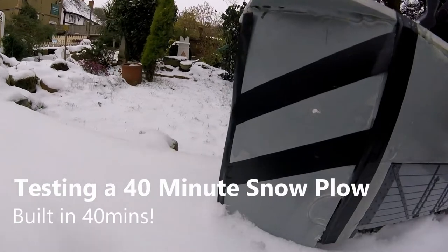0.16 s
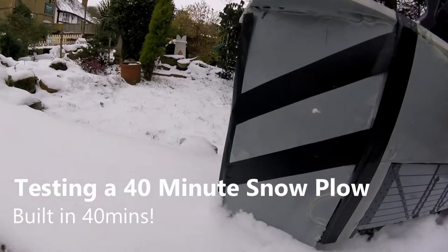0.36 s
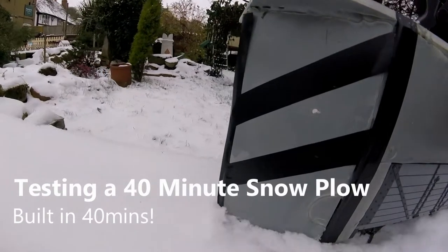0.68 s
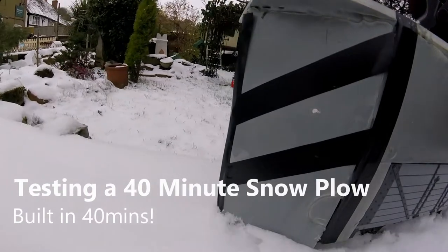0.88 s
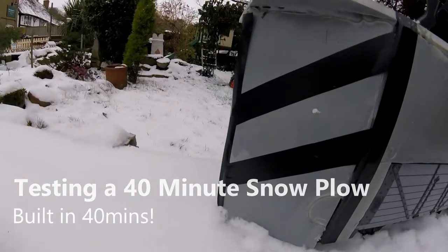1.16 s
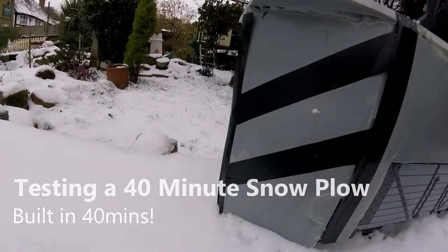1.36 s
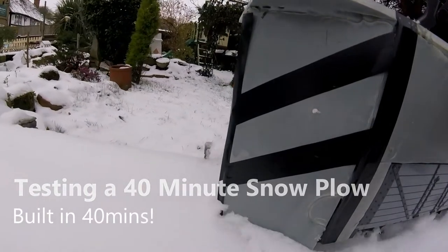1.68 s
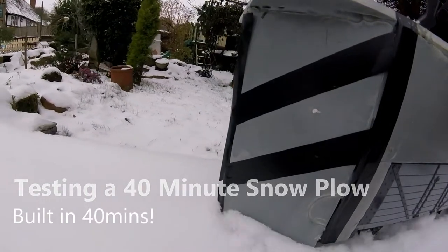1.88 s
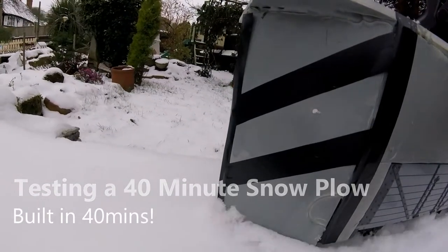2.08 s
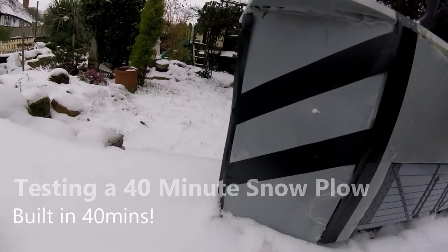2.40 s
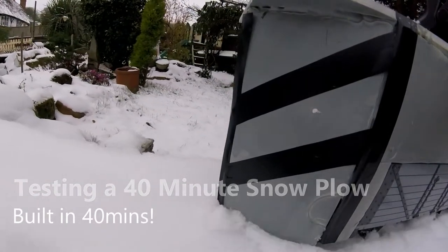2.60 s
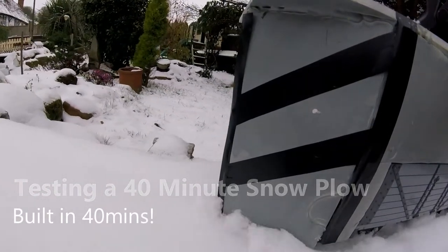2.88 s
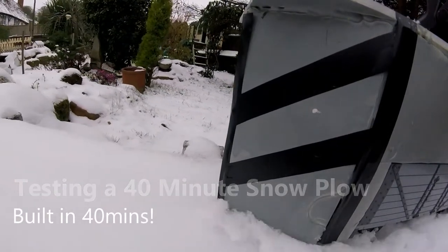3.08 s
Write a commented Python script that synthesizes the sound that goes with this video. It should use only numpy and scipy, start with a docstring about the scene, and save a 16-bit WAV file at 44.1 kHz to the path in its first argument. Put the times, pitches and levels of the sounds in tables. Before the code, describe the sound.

A model locomotive runs throughout, heard from an on-board microphone in dry open air. Its rough gear whirr and rattle step up slightly in pitch until about 1.8 s. Beneath it, deep rumble and booms pulse unevenly, with thumps strongest near 0.4 s and again at 1.1 s. A dry click comes at 0.5 s. Faint snow hiss, tiny ticks and thin whines continue to 3.25 s.

```python
"""Model locomotive ploughing snow, from on board

A microphone rides on a model locomotive as it pushes a plough through garden snow, in open air.
Gear harmonics locked to the shaft whirr over a loose noise rattle and quicken in small steps.
A gliding sine booms over filtered-noise rumble; bumps ring decaying modes of the body.
Snow is noise and grains shaped by the blade, with ticking crumbs; whines and a thin buzz
run through it, and one dry click is heard."""
import sys
import numpy as np
from scipy import signal
from scipy.fft import rfft, irfft
from scipy.io import wavfile
from scipy.ndimage import uniform_filter1d, map_coordinates

SR = 44100
rng = np.random.default_rng(int(sys.argv[2]) if len(sys.argv) > 2 else 0)


def transcribe(u):
    """Save the signal u as a 16-bit wav file named by the first command-line argument.

    u: samples, shape (n,) or (channels, n), limited to [-1, 1]; the rate is SR.
    q: integer samples, one column per channel.
    """
    v = np.clip(np.atleast_2d(u).T, -1, 1)
    q = np.round(v * 32767).astype(np.int16)
    wavfile.write(sys.argv[1], SR, q)


N = 143325
T = np.arange(N) / SR  # seconds

GEAR_WAVER, WAVER_PER_S = 0.26, 4.846  # slow swell: rms share of amplitude, changes per second
ROUGH_PER_S = 50  # fast roughness, changes per second


def undb(db):
    """Amplitude ratio from dB."""
    return 10 ** (np.asarray(db) / 20)


def unit(x):
    """Scale to rms 1."""
    return x / np.sqrt(np.mean(x ** 2))


def curve(rows, axis=1):
    """Gain over time from one dB column of a table that starts with seconds."""
    rows = np.array(rows, float)
    return undb(np.interp(T, rows[:, 0], rows[:, axis]))


def noise():
    """White noise."""
    return rng.standard_normal(N)


def walk(rate):
    """Smooth random motion of rms 1, changing about rate times a second."""
    hold = int(SR / rate)
    held = np.repeat(rng.standard_normal(N // hold + 3), hold)
    start = rng.integers(hold)
    return unit(uniform_filter1d(held, hold)[start:start + N])


def colour(x, points):
    """Shape by a spectrum of (Hz, dB) points; rms 1."""
    hz, db = np.array(points, float).T
    f = np.fft.rfftfreq(N, 1 / SR) + 1  # 1 Hz up, to keep the logarithm finite
    gain = undb(np.interp(np.log(f), np.log(hz), db))
    return unit(irfft(rfft(x) * gain, N))


def resonate(x, hz, width_hz):
    """One resonance, gain 1 at its centre."""
    return signal.lfilter(*signal.iirpeak(hz, hz / width_hz, fs=SR), x)


def resonate_twice(x, hz, width_hz):
    """The same resonance passed twice, for steeper skirts."""
    return resonate(resonate(x, hz, width_hz), hz, width_hz)


def fade(start, decay):
    """Sudden onset and exponential decay, both in seconds."""
    return (T >= start) * np.exp(-np.maximum(T - start, 0) / decay)


def shaft():
    """Turns made by the drive shaft: the running sum of a speed that steps up."""
    # Each row: start in seconds, shaft turns per second.
    speed_steps = [(0, 14.505), (.28, 14.72), (.52, 15.235), (.8, 15.476), (1.74, 16.291)]
    starts, rates = np.array(speed_steps).T
    stepped = rates[np.searchsorted(starts, T, side="right") - 1]
    return np.cumsum(uniform_filter1d(stepped, size=900)) / SR


def body():
    """The body's lowest resonance swells and sinks over wheel rumble and the rocking chassis."""
    # Boom pitch. Each row: time in seconds, pitch in Hz.
    boom_pitch = [(0, 76.6), (.6, 75.82), (1.0, 77.4), (1.3, 78.95), (1.5, 76), (2.0, 75), (2.2, 78.3),
                  (2.6, 77.6), (2.85, 80.4), (3.25, 79)]
    # Boom level. Each row: time in seconds, level in dB before smoothing and trim.
    boom_level = [(0.0, -36), (0.03, -14.5), (0.06, -31.5), (0.09, -15), (0.27, -24.5), (0.29, -32),
                  (0.39, -20), (0.405, -23), (0.43, -7.5), (0.47, -19.5), (0.54, -12), (0.59, -33),
                  (0.62, -19), (0.65, -36), (0.78, -16), (0.83, -32), (0.9, -20), (0.94, -36), (0.99, -33),
                  (1.01, -15), (1.09, -22.5), (1.12, -17.5), (1.18, -24.5), (1.24, -24), (1.26, -11),
                  (1.3, -29.5), (1.35, -32), (1.38, -11.5), (1.41, -24.5), (1.43, -15.5), (1.49, -20.5),
                  (1.54, -13.5), (1.59, -26), (1.76, -22.5), (1.79, -46), (1.82, -43), (1.86, -19),
                  (1.89, -15.5), (1.94, -35), (1.95, -21), (2.03, -27), (2.065, -16), (2.13, -37),
                  (2.17, -27.5), (2.205, -12.5), (2.24, -19), (2.32, -18), (2.34, -38), (2.38, -18),
                  (2.42, -32), (2.48, -14), (2.54, -36), (2.58, -16.5), (2.62, -19), (2.73, -29.5),
                  (2.75, -25.5), (2.88, -20), (2.96, -27.5), (2.99, -21), (3.05, -20), (3.09, -30),
                  (3.15, -27), (3.25, -41)]
    # Spectrum of the rolling wheels. Each row: frequency in Hz, relative density in dB.
    rumble_spectrum = [(20, -31.5), (55, -4.5), (75, -6.5), (98, -2), (122, -1), (145, -17), (195, -21.5),
                       (230, -10), (270, -17), (350, -13.5), (430, -24.5), (700, -38.5), (1800, -62.5),
                       (6000, -88.5)]
    # Each row: time in seconds, rumble level in dB before trim.
    rumble_level = [(0.0, -31.5), (0.14, -30.5), (0.24, -32.5), (0.38, -27), (0.86, -33.5), (1.05, -27.5),
                    (1.2, -31), (1.73, -34), (3.25, -33)]
    # Spectrum of the rocking chassis. Each row: frequency in Hz, relative density in dB.
    rock_spectrum = [(15, -10), (33, -9), (52, -2), (62, -1.5), (80, -19.5), (140, -46.5), (1000, -100)]
    # Each row: time in seconds, rocking level in dB before trim.
    rock_level = [(0.0, -26), (0.55, -28), (0.65, -36.5), (1.35, -24.5), (1.73, -36), (1.76, -31),
                  (1.97, -45), (2.03, -30.5), (2.37, -33), (2.48, -27), (2.51, -38.5), (3.25, -30.5)]
    boom_db, rumble_db, rock_db = 0.5, 3, 2.5  # trims
    boom_wander_hz, boom_slew_s = 1, 0.014

    hz = np.interp(T, *np.array(boom_pitch).T) + boom_wander_hz * walk(30.31)
    swell = uniform_filter1d(curve(boom_level), int(boom_slew_s * SR)) * undb(boom_db)
    boom = np.sqrt(2) * np.sin(2 * np.pi * np.cumsum(hz) / SR) * swell
    rumble = colour(noise(), rumble_spectrum) * curve(rumble_level) * undb(rumble_db)
    rocking = colour(noise(), rock_spectrum) * curve(rock_level) * undb(rock_db)
    return boom + rumble + rocking


def bumps():
    """Each bump in the track pushes the body briefly and rings its modes, which then die away."""
    # Each row: time in seconds, level in dB, tilt in dB from one mode to the next.
    bump_rows = [(0.365, -11, -3.5), (.402, -21, 5.5), (.42, -7, -18.5), (.597, -16, -3.5),
                 (1.109, -12.5, -16), (1.127, -12, 0.5), (1.25, -22, -8), (1.365, -22, -14),
                 (1.399, -35, 5), (2.745, -21, 2.5), (3.04, -21, 5.5)]
    # Modes of the body. Each row: frequency in Hz, level in dB, time to fall 60 dB in seconds.
    body_modes = [(114.5, -1.5, 0.16), (235, -2.5, 0.1), (345, -10.5, 0.082)]
    push_s = 0.0063  # time constant of the rise

    total = np.zeros(N)
    for at, db, tilt_db in bump_rows:
        for i, (hz, mode_db, t60) in enumerate(body_modes):
            envelope = fade(at, t60 / np.log(1000)) - fade(at, push_s)
            ring = envelope * np.sin(2 * np.pi * hz * (T - at))
            total += undb(db + mode_db + i * tilt_db) * ring
    return total


def click():
    """One dry, sharp click: a one-sided pulse that decays without any ring."""
    return -undb(-11.5) * fade(0.4914, decay=0.0021)


def snow():
    """Fine grains slide over the blade and ring it at wavering pitches; larger crumbs tick."""
    # Spectrum of the sliding snow. Each row: frequency in Hz, relative density in dB.
    snow_spectrum = [(1200, 4), (1850, -2.5), (2300, 2.5), (2750, -1), (3150, -6.5), (4000, -3.5),
                     (4500, -11), (5200, -2), (6100, -3.5), (6550, -1), (7300, -10.5), (8800, -12.5),
                     (10000, -21), (13000, -29), (14500, -50.5)]
    # Each row: time in seconds, level in dB before the trims of hiss and rings.
    snow_level = [(0, -53.5), (.9, -54), (1.12, -52), (1.3, -53), (1.52, -52.5), (1.7, -53.5),
                  (1.87, -52.5), (2.03, -52.3), (2.15, -54), (3.25, -54.5)]
    # Rings of the blade. Each row: frequency in Hz, half the width of one pass in Hz, level in dB.
    blade_rings = [(3477, 59, 3.5), (3925, 46, 2.5), (4182, 72, -0.5)]
    # Crumbs hitting the blade. Each row: time in seconds, level in dB before filter and gain.
    crumbs = [(.017, -45.5), (.615, -51.5), (.718, -49.5), (1.104, -46), (1.169, -53), (1.188, -49),
              (1.459, -50), (1.543, -46), (2.105, -50), (2.217, -51), (2.422, -49.5), (2.473, -51),
              (2.726, -49)]
    snow_db, blade_db = 6, -8  # trims of hiss and rings
    grains_per_s, grain_spread_db, grain_db = 1000, 3.5, -3.5
    flicker_db, flicker_per_s = 0.55, 24
    ring_waver, ring_waver_per_s = 0.00402, 11  # rms share of the pitch, changes per second
    crumb_decay_s, crumb_hz, crumb_width_hz = 0.0099, 5760, 2440

    hits = (rng.random(N) < grains_per_s / SR) * np.sign(noise())
    sizes = undb(grain_spread_db * np.minimum(rng.exponential(size=N), 5))
    rub = noise() + undb(grain_db) * unit(hits * sizes)
    rub = rub * undb(flicker_db * walk(flicker_per_s))

    rings = unit(sum(undb(db) * resonate_twice(rub, hz, 2 * width) for hz, width, db in blade_rings))
    # Reading the rings at an uneven pace bends their pitch.
    read_at = np.cumsum(1 + ring_waver * walk(ring_waver_per_s))
    rings = map_coordinates(rings, [read_at], mode="mirror")
    hiss = colour(rub, snow_spectrum)
    slide = (undb(snow_db) * hiss + undb(blade_db) * rings) * curve(snow_level)

    ticks = noise() * sum(undb(db) * fade(at, crumb_decay_s) for at, db in crumbs)
    return slide + 4 * resonate_twice(ticks, crumb_hz, crumb_width_hz)


def tone(rows, jitter_hz, rough):
    """A sine with random roughness and pitch jitter along rows of (seconds, Hz, dB)."""
    at, hz, _ = np.array(rows, float).T
    unsteady_hz = np.interp(T, at, hz) + jitter_hz * walk(ROUGH_PER_S)
    phase = 2 * np.pi * np.cumsum(unsteady_hz) / SR
    return unit((1 + rough * walk(ROUGH_PER_S)) * np.sin(phase)) * curve(rows, axis=2)


def whines():
    """The rubbed blade sings at a gliding pitch; a thin whine sinks slowly below it."""
    # The singing blade. Each row: time in seconds, pitch in Hz, level in dB.
    sing = [(0, 3440, -79), (.76, 3337, -72), (.95, 3423, -70), (1.14, 3460, -55.5), (1.45, 3508, -62),
            (1.73, 3435, -64.5), (1.85, 3420, -77), (3.25, 3480, -68)]
    # The thin whine. Each row: time in seconds, pitch in Hz, level in dB.
    thin_whine = [(0, 2914, -67), (.25, 2907, -62), (.5, 2810, -73), (1.45, 2805, -62.5), (1.9, 2773, -65),
                  (2.3, 2732, -72)]
    return tone(sing, jitter_hz=18, rough=0.21) + tone(thin_whine, jitter_hz=8, rough=0.67)


def motor():
    """A thin buzz of resonant noise, partly the same on every turn, with one faint whine in it."""
    # Each row: time in seconds, buzz level in dB.
    buzz_level = [(0, -58.5), (2, -70), (2.5, -54.5), (3.25, -54)]
    buzz_hz, buzz_width_hz = 2320, 730
    buzz_noise_db = 3.5  # unrepeated noise against the repeating scrape
    whine_order, whine_db = 133, -7.5  # multiple of the shaft rate, dB against the buzz

    turns = shaft()
    one_turn = rng.standard_normal(size=2800)
    repeating = map_coordinates(one_turn, [turns % 1 * len(one_turn)], mode="wrap")
    scrape = repeating + undb(buzz_noise_db) * noise()
    buzz = unit(resonate_twice(scrape, buzz_hz, buzz_width_hz))
    swell = 1 + GEAR_WAVER * walk(WAVER_PER_S)
    whine = unit(swell * np.sin(2 * np.pi * whine_order * turns))
    return (buzz + undb(whine_db) * whine) * curve(buzz_level)


def mesh():
    """The main gear mesh whines at a fixed multiple of the shaft rate, its phase slipping a little."""
    # Each row: time in seconds, whine level in dB.
    mesh_level = [(0, -52), (.35, -42), (.6, -48.5), (1.1, -46.5), (1.45, -39.5), (1.9, -47.5), (2.25, -43),
                  (2.5, -49.5), (2.8, -43.5), (3.25, -41.5)]
    order = 52  # multiple of the shaft rate
    slip_rad, slip_per_s = 1.0, 26
    phase = 2 * np.pi * order * shaft() + slip_rad * walk(slip_per_s)
    return np.sqrt(2) * np.sin(phase) * curve(mesh_level)


def gears():
    """Harmonics of the shaft turn, each wavering as teeth mesh unevenly, over a loose rattle."""
    # Bed of harmonics. Each row: multiple of the shaft rate, relative level in dB.
    gear_bed = [(20, -15), (30, -8.5), (35, -6), (37, -15.5), (45, -5), (46, -5), (54, -4), (58, -10),
                (65, -1.5), (68, -4), (75, -12), (81, -12), (91, -12.5), (103, -14.5), (106, -34.5)]
    # Harmonics that replace the bed. Each row: multiple of the shaft rate, relative level in dB.
    gear_strong = [(22, -2), (25, -4), (26, -1.5), (28, -8.5), (33, -4), (34, -5.5), (40, -2.5), (42, -2.5),
                   (47, -0.5), (48, -2), (50, 2.5), (51, 0), (52, -9), (53, -3.5), (61, -5), (66, -1.5),
                   (71, 1.5), (79, -3), (80, -7), (82, -1.5), (83, -1.5), (89, -4.5), (93, -7.5), (98, -3),
                   (101, -6.5)]
    # Each row: time in seconds, then low, middle and high register level in dB before trim.
    gear_level = [(0, -39.5, -39, -37), (.75, -39, -39, -37.5), (1.55, -37.5, -38.5, -37.5),
                  (2, -39, -38, -40), (2.45, -40.5, -37, -43.5), (3.25, -40, -36.5, -44.5)]
    # Trims of the low, middle and high register in dB.
    register_db = [0, -0.5, -1.5]
    # Highest harmonic number of the low and of the middle register.
    register_edges = [38, 59]
    # Rattle of the teeth between harmonics. Each row: frequency in Hz, relative density in dB.
    rattle_spectrum = [(150, -26.5), (330, -3), (490, 2), (600, -11.5), (790, -2.5), (930, -5.5),
                       (1060, -5.5), (1200, -8.5), (1500, -7), (1620, -13), (1800, -22), (6000, -66.5)]
    gear_rough, rattle_db = 0.36, -1  # rms share of amplitude, dB against the high register's curve

    turns = shaft()
    bed = np.array(gear_bed, float)
    strong = {round(k): db for k, db in gear_strong}
    wavers = [GEAR_WAVER * walk(WAVER_PER_S) + gear_rough * walk(ROUGH_PER_S) for _ in range(12)]
    registers = np.zeros((len(register_db), N))
    for k in range(20, 107):
        angle = (2 * np.pi * ((k * turns + rng.random()) % 1)).astype(np.float32)
        # Two different wavers, shifted at random, move the amplitude and the phase.
        first, second = rng.permutation(len(wavers))[:2]
        swell = np.roll(wavers[first], rng.integers(N))
        slip = np.roll(wavers[second], rng.integers(N))
        line = (1 + swell) * np.cos(angle) + slip * np.sin(angle)
        level_db = strong.get(k, np.interp(k, *bed.T))
        registers[np.searchsorted(register_edges, k)] += undb(level_db) * line

    whirr = np.zeros(N)
    for i, register in enumerate(registers):
        whirr += unit(register) * curve(gear_level, axis=i + 1) * undb(register_db[i])
    rattle = colour(noise(), rattle_spectrum) * curve(gear_level, axis=3) * undb(rattle_db)
    return whirr + rattle


def scene():
    """Every source rides with the microphone at a fixed distance, in open air without echo."""
    mix = body() + bumps() + click() + snow() + whines() + motor() + mesh() + gears()
    return mix[None]  # one channel


def record(dry):
    """The camera's microphone path cuts the top steeply above 15.8 kHz."""
    low_pass = signal.ellip(8, .2, 70, 15800, fs=SR, output="sos")  # ripple, stopband in dB
    return signal.sosfilt(low_pass, dry)


dry = scene()
out = record(dry)
transcribe(out)
```